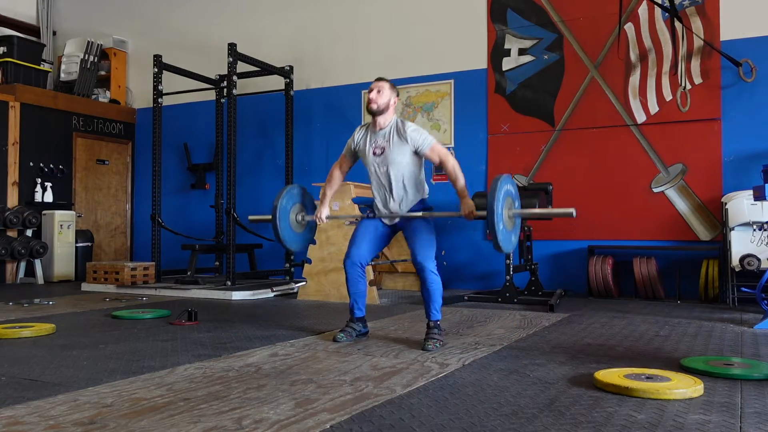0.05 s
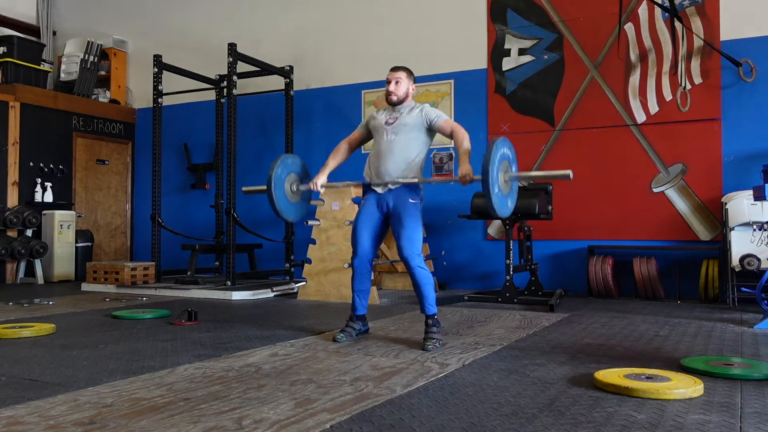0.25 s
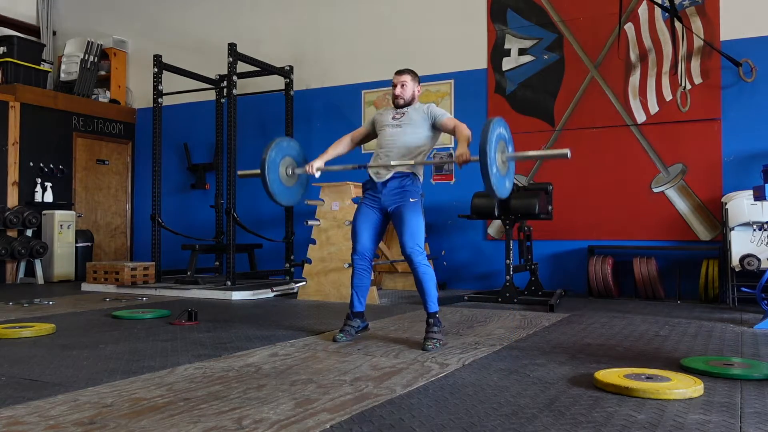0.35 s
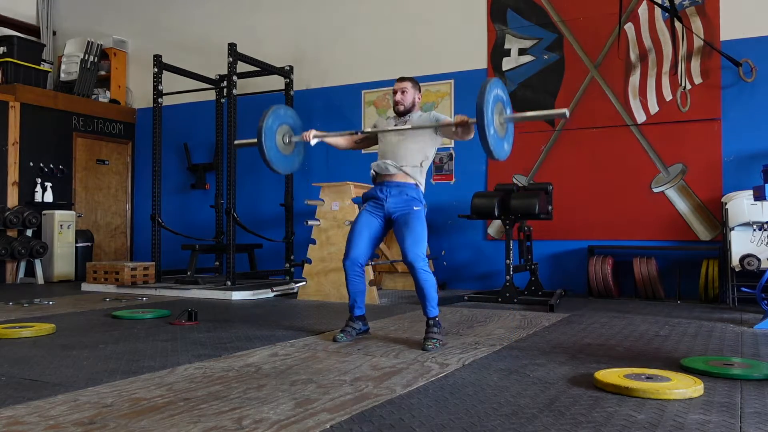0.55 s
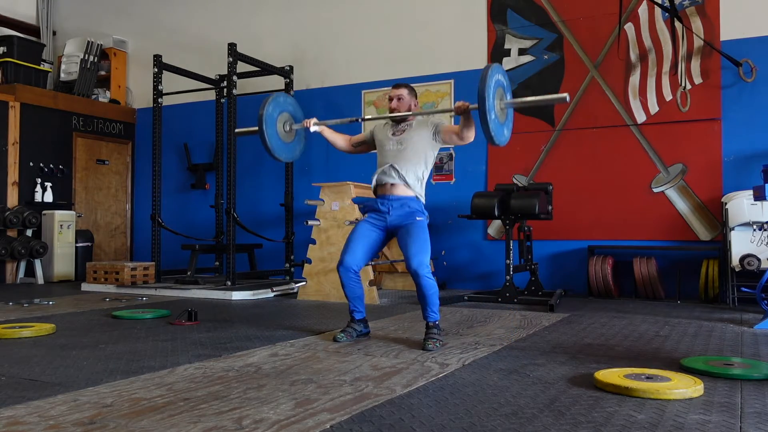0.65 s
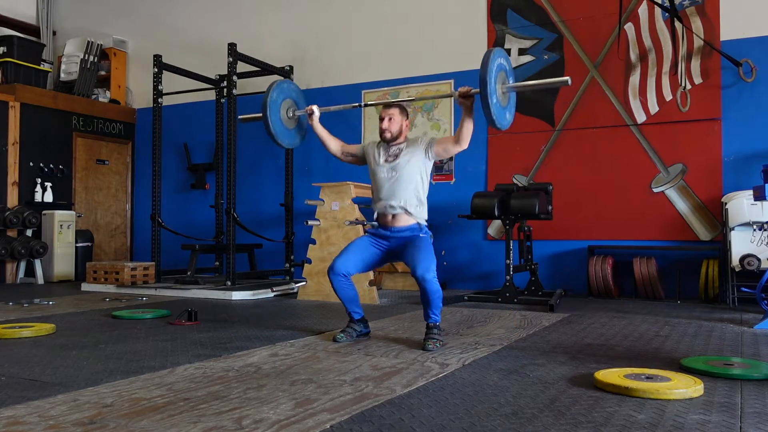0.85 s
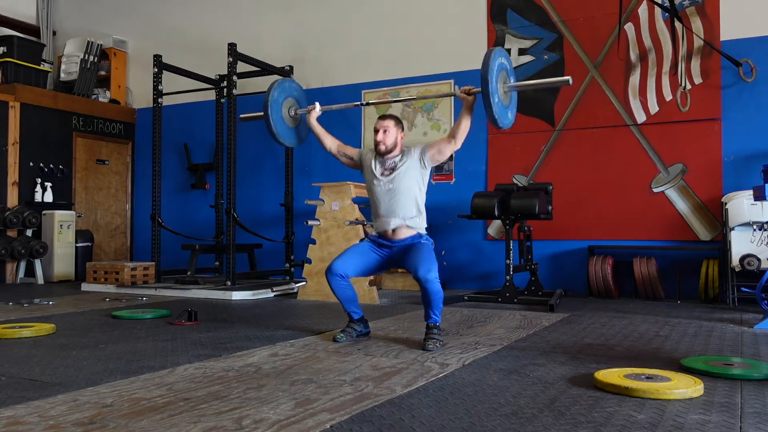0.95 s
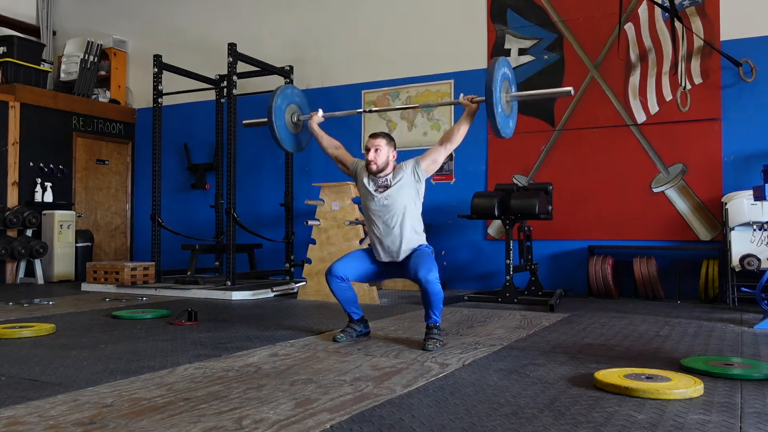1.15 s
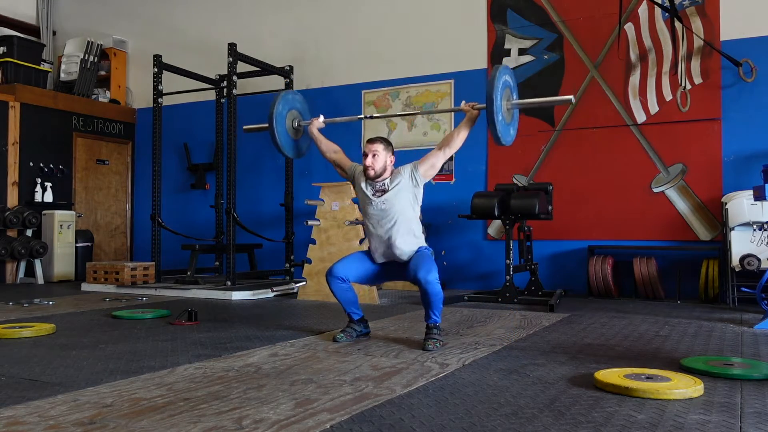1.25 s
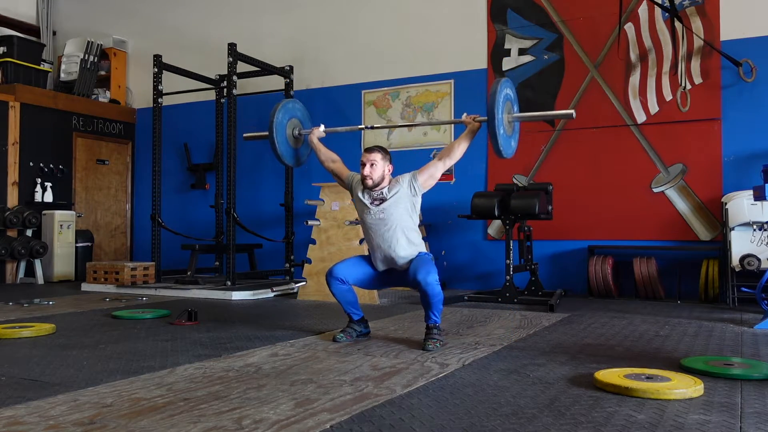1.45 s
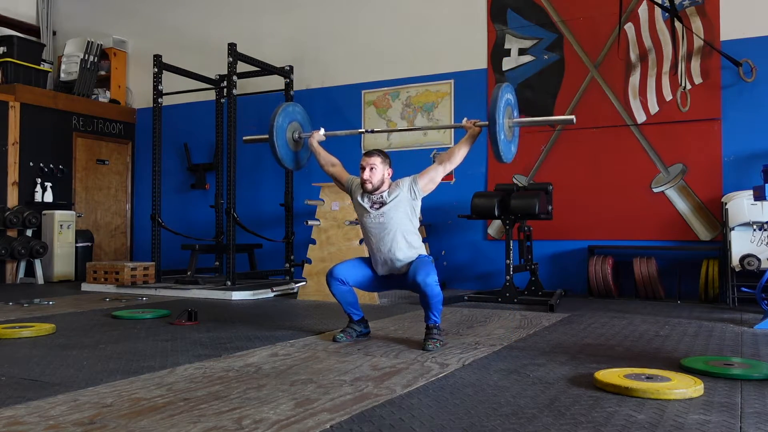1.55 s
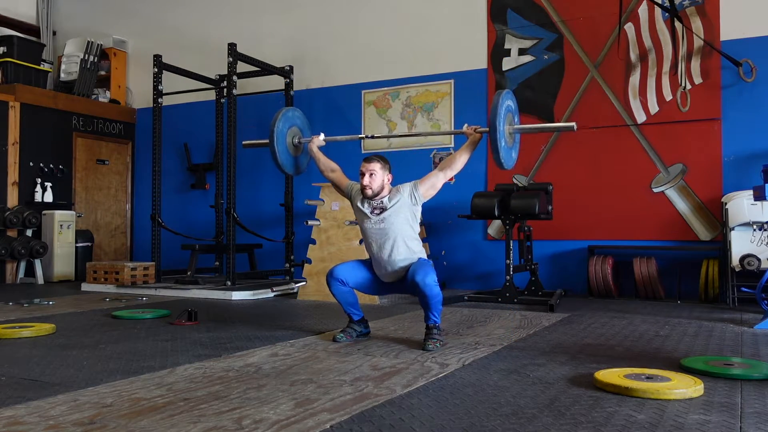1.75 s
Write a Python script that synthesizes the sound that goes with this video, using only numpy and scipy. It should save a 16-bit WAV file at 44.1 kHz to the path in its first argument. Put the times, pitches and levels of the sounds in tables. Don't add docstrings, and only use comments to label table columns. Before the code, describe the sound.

Barbell clatter: loose plates knock and steel sleeves clink, then feet thud onto a platform in an echoing gym

```python
import sys
import numpy as np
from scipy import signal
from scipy.fft import rfft, irfft, next_fast_len
from scipy.io import wavfile
from scipy.ndimage import map_coordinates

SR = 44100
rng = np.random.default_rng(int(sys.argv[2]) if len(sys.argv) > 2 else 0)


def transcribe(signal):
    frames = np.atleast_2d(signal).T
    limited = np.clip(frames, -1, 1)
    pcm = np.round(limited * 32767).astype(np.int16)
    wavfile.write(sys.argv[1], SR, pcm)


def linear_from_db(decibels):
    return 10 ** (np.asarray(decibels, float) / 20)


N = 79380
T = np.arange(N) / SR


def unit(x):
    return x / np.sqrt(np.mean(x ** 2) + 1e-20)


def along(points, hz):
    f, v = np.transpose(points)
    return np.interp(np.log(hz + 1), np.log(f + 1), v)


def filtered(x, response):
    m = next_fast_len(N + SR // 2)
    return irfft(rfft(x, m) * response(np.fft.rfftfreq(m, 1 / SR)), m)[..., :N]


def body(peaks):
    def response(f):
        total = 0
        for k, (centre, width, db) in enumerate(peaks):
            peak = 1j * f * width / (centre * centre - f * f + 1j * f * width)
            total = total + (-1) ** k * linear_from_db(db) * peak
        return total
    return response


def ring(modes, t, rise_s, spread_db):
    total = 0
    for hz, db, t60 in modes:
        fade = linear_from_db(db + spread_db * rng.normal() - 60 * t / t60)
        detuned_hz = hz * (1 + 0.014 * rng.normal())
        total = total + fade * np.sin(2 * np.pi * detuned_hz * t)
    return (1 - np.exp(-t / rise_s)) * total


def add(track, s, sound):
    track[round(s * SR):][:len(sound)] += sound


def hiss(spectrum, wide_db):
    mid, side = filtered(rng.standard_normal((2, N)), lambda hz: linear_from_db(along(spectrum, hz)))
    side = linear_from_db(wide_db) * side
    return unit(np.array([mid + side, mid - side]))


# t/s, peak level/dB, low f/Hz, high f/Hz, high over low level/dB
PLATE_KNOCKS = [(.232, -22.5, 672, 1740, -2.5), (.235, -9.5, 654, 1687, 8), (.246, -20.5, 673, 1570, 9.5),
                (.287, -7, 689, 1246, 20.5), (.328, -16.5, 691, 1136, 19.5), (.334, -16, 685, 1218, 18),
                (.344, -18, 640, 1121, 30), (.350, -25.5, 640, 1100, 11), (.3615, -19.5, 640, 1287, 12),
                (.372, -13.5, 627, 1406, 3), (.384, -21, 603, 1307, 5), (.393, -26.5, 640, 1300, 18),
                (.402, -30, 700, 1270, 19), (.407, -22, 680, 1200, 30), (.414, -17, 684, 1230, 18.5),
                (.422, -19.5, 708, 1230, 28), (.477, -20.5, 860, 1256, 15.5), (.500, -18.5, 698, 1300, 4),
                (.508, -28.5, 694, 1270, 7.5), (.514, -23.5, 690, 1280, 23), (.537, -26, 720, 1490, 27),
                (.563, -27, 674, 1220, 11), (.523, -21, 706, 1339, 13.5), (.545, -23.5, 720, 1280, 36),
                (.579, -20, 906, 1611, 6), (.586, -19, 617, 1624, -9), (.600, -20, 676, 1278, 14),
                (.626, -22.5, 927, 1556, -8), (.636, -16, 760, 1551, 0), (.639, -14, 797, 1140, 15),
                (.640, -17.5, 744, 1576, 10.5), (.645, -8, 739, 1550, -2.5), (.657, -32, 760, 1800, 2)]
# t/s, peak level/dB, low # f/Hz, high f/Hz, high over low level/dB
HARD_RAPS = [(.164, -38.5, 2165, 3740, -3), (.166, -42.5, 650, 1240, 6), (.200, -32.5, 1160, 1450, 3.5),
             (.2125, -29, 700, 2100, 3), (.276, -40, 866, 1540, 16), (.4685, -10.5, 770, 1708, 5),
             (.469, -16.5, 518, 2896, -11.5), (.488, -16.5, 820, 1300, 4), (.488, -26, 4110, 4560, -4),
             (.502, -31.5, 2790, 4490, -10), (.657, -27.5, 4200, 4450, 2), (1.504, -28, 920, 1690, -13),
             (1.504, -34, 736, 1300, -11), (1.510, -36, 958, 1706, -5), (1.548, -48.5, 950, 1650, -18),
             (1.646, -35.5, 1103, 1575, -4), (1.651, -42, 1140, 1600, 10)]
KNOCK_RISE_S, KNOCK_FALL_S, KNOCK_SNAP_DB = .002, .007, -16.5
RAP_RISE_S, RAP_FALL_S, RAP_SNAP_DB = .0004, .005, -16.5
FALL_POWER = 1.7
ROUGHNESS = .2


def plates():
    out, t = np.zeros(N + SR), np.arange(SR // 16) / SR
    for rows, rise_s, fall_s, snap_db in (
            (PLATE_KNOCKS, KNOCK_RISE_S, KNOCK_FALL_S, KNOCK_SNAP_DB),
            (HARD_RAPS, RAP_RISE_S, RAP_FALL_S, RAP_SNAP_DB)):
        shape = (1 - np.exp(-t / rise_s)) ** 2 * np.exp(-(t / fall_s) ** FALL_POWER)
        shape = shape / shape.max()
        for s, db, low_hz, high_hz, over_db in rows:
            wobbles = rng.standard_normal((2, 40))
            rough = [1 + ROUGHNESS * map_coordinates(knots, [t * 400]) for knots in wobbles]
            low = rough[0] * np.sin(2 * np.pi * low_hz * t)
            high = rough[1] * np.sin(2 * np.pi * high_hz * t)
            pair = (low + linear_from_db(over_db) * high) / (1 + linear_from_db(over_db))
            dull = signal.butter(2, [.75 * low_hz, 1.25 * high_hz], "band", fs=SR)
            noise = signal.lfilter(*dull, rng.standard_normal(len(t)))
            snap = linear_from_db(snap_db) * unit(signal.lfilter(*dull, noise))
            add(out, s - .001, linear_from_db(db) * shape * (pair + snap))
    return out[:N]


# t/s, peak level/dB, bright over dark modes level/dB
SLEEVE_CLINKS = [(0.166, -30.5, -22), (0.2149, -27.5, -18), (0.2309, -24, -22.5), (0.2434, -15.5, -17.5),
                 (0.2574, -40, -11), (0.2857, -23, -49), (0.3057, -41, -18.5), (0.3409, -20, -15.5),
                 (0.391, -20, -8.5), (0.3947, -25, -13.5), (0.424, -26, -19), (0.4494, -25.5, -9),
                 (0.4693, -20, -15.5), (0.4885, -12.5, -18), (0.5013, -18.5, -14), (0.5372, -19, -18),
                 (0.6029, -30.5, -2), (0.607, -19.5, -22.5), (0.6421, -19, -9.5), (0.6594, -24.5, -24.5),
                 (0.6881, -37.5, -2)]
# f/Hz, level/dB, time to fall 60 dB/s
DARK_STEEL = [(2793, 6.5, 0.012), (3450, -21, 0.029), (3754, -4, 0.028), (4270, -0.5, 0.008),
              (4610, -7, 0.014)]
BRIGHT_STEEL = [(5600, -8, .02), (6200, -1, .035), (6330, -8, .08), (6450, -4, .03), (7100, -10, .02),
                (9900, -28, .012)]
CLINK_DB, SCRAPE_DB, SCRAPE_S = -10.5, 7.5, 0.0055
CLINK_SPREAD_DB = 2.5


def sleeves():
    out, rub, t = np.zeros(N + SR), np.zeros((2, N + SR)), np.arange(SR // 16) / SR
    for s, db, bright_db in SLEEVE_CLINKS:
        dark_ring = ring(DARK_STEEL, t, 0.00097, CLINK_SPREAD_DB)
        bright_ring = ring(BRIGHT_STEEL, t, 0.00079, CLINK_SPREAD_DB)
        add(out, s, linear_from_db(db + CLINK_DB) * (dark_ring + linear_from_db(bright_db + 7.0) * bright_ring))
        fade = np.exp(-(t / SCRAPE_S) ** 2)
        scrape = linear_from_db(db + CLINK_DB + SCRAPE_DB) * fade * rng.standard_normal((2, len(t)))
        add(rub[0], s, scrape[0])
        add(rub[1], s, linear_from_db(bright_db + 4.5) * scrape[1])
    dark = body([(2100, 410, -0.41), (2785, 820, 1.3), (4200, 1400, 0.2)])
    bright = body([(5960, 630, 6.0), (7670, 760, -17.5)])
    dark_scrape = filtered(rub[0, :N], lambda f: dark(f) * dark(f))
    return out[:N] + dark_scrape + filtered(rub[1, :N], bright)


# t/s, level/dB
SHAKE_STRENGTH = [
    (.2, -69.5),
    (.26, -35.5),
    (.325, -30.5),
    (.43, -28),
    (.5, -31),
    (.6, -27),
    (.7, -32.5),
    (.9, -41.5),
    (1.4, -62.5),
    (1.8, -65),
]
# f/Hz, width/Hz, level/dB
RUBBER_BODY = [(640, 207, -5), (812, 177, -4), (1230, 348, 0.5), (1553, 46, 4), (1640, 300, -3),
               (2690, 200, -11)]
STEEL_BODY = [(2926, 290, 10.5), (3750, 150, 9), (4160, 910, 6), (6440, 250, 3), (6850, 240, -3),
              (9900, 500, -27)]
# f/Hz, width/Hz, level/dB
HUB_BODY = [(1205, 102, 7), (1300, 86, 4)]
# t/s, level/dB
HUB_STRENGTH = [
    (.28, -84),
    (.3, -41),
    (.325, -40.5),
    (.335, -25.5),
    (.43, -34),
    (.455, -39),
    (.55, -35),
    (.63, -44.5),
    (.7, -53.5),
]
TAPS_PER_S, TAP_SPREAD_DB = 1500, 2.5
JINGLE_DB, SOFT_HZ = -15.5, 2340


def rattle():
    hits = rng.random((2, N)) < TAPS_PER_S / SR
    force = linear_from_db(TAP_SPREAD_DB * rng.exponential(size=(2, N)).clip(0, 3))
    taps = hits * force * rng.normal(size=(2, N))
    strength = linear_from_db(np.interp(T, *np.transpose(SHAKE_STRENGTH)))
    rubber = filtered(taps[0], lambda f: body(RUBBER_BODY)(f) / (1 + 1j * f / SOFT_HZ) ** 2)
    steel = filtered(taps[1], lambda f: body(STEEL_BODY)(f) / (1 + 1j * f / (3 * SOFT_HZ)) ** 2
                     * f / (f + SOFT_HZ))
    hub_strength = linear_from_db(np.interp(T, *np.transpose(HUB_STRENGTH), right=-99))
    hub = hub_strength * unit(filtered(rng.standard_normal(N), body(HUB_BODY)))
    return hub + strength * (unit(rubber) + linear_from_db(JINGLE_DB) * unit(steel))


# t/s, slap level/dB, thud level/dB
LANDINGS_AND_BUMPS = [
    (0.368, -23, -17.5),
    (0.463, -19.5, -21.5),
    (0.7465, -4.5, -6.5),
    (0.9426, -11.5, -18),
    (1.041, -35, -28),
]
# f/Hz, level/dB, time to fall 60 dB/s
PLATFORM_MODES = [(123.2, -12.5, 0.19), (157, -7, 0.06), (224, -2, 0.025), (267.6, 3, 0.02),
                  (364, 3.5, 0.023), (450, -6, 0.0081)]
SLAP_HZ, SLAP_S, THUD_LAG_S = 760, 0.001, 0.00285
FAR_WALL_S, FAR_WALL_DB, FAR_WALL_HZ = .034, -4, 470


def shoes():
    out, t = np.zeros(N + SR), np.arange(SR // 2) / SR
    u = t[:440] - 220 / SR
    slap = np.exp(-(u / SLAP_S) ** 2) * np.cos(2 * np.pi * SLAP_HZ * u)
    for s, slap_db, thud_db in LANDINGS_AND_BUMPS:
        add(out, s - 220 / SR, linear_from_db(slap_db) * slap)
        add(out, s + THUD_LAG_S, linear_from_db(thud_db - 9.5) * ring(PLATFORM_MODES, t, 0.00035, 0.3))

    def with_far_wall(f):
        delay = -2j * np.pi * f * FAR_WALL_S
        return 1 + linear_from_db(FAR_WALL_DB) * np.exp(delay - (f / FAR_WALL_HZ) ** 2 / 2)
    return filtered(out[:N], with_far_wall)


# f/Hz, width/Hz, level/dB
LOOSE_BOARDS = [(139, 53, 2), (250, 110, 3), (393, 165, -0.5)]
SHUDDER_DB, SHUDDER_T60, SHUDDER_RISE_S = -16, 0.65, 0.033


def shudder():
    swell = 0
    for s, _, thud_db in LANDINGS_AND_BUMPS:
        t = np.maximum(T - s, 0)
        rise = 1 - np.exp(-(t / SHUDDER_RISE_S) ** 2)
        swell = swell + linear_from_db(thud_db + SHUDDER_DB - 60 * t / SHUDDER_T60) * rise
    bursts = linear_from_db(3 * map_coordinates(rng.standard_normal(120), [T * 60]))
    boards = filtered(rng.standard_normal(N), lambda f: body(LOOSE_BOARDS)(f) / (1 + 1j * f / 600) ** 2)
    return swell * unit(bursts * boards)


# t/s, level/dB
LOAD_STRENGTH = [
    (.02, -65),
    (.2, -55),
    (.26, -35.5),
    (.4, -34),
    (.7, -38.5),
    (.95, -32.5),
    (1.2, -53),
    (1.5, -42.5),
    (1.8, -48),
]
# f/Hz, width/Hz, level/dB
LOADED_BOARDS = [(123.8, 16, 9), (191, 44, 4), (304, 1100, -15)]


def platform():
    boards = filtered(rng.standard_normal(N), lambda f: body(LOADED_BOARDS)(f) / (1 + 1j * f / 400) ** 2)
    return linear_from_db(np.interp(T, *np.transpose(LOAD_STRENGTH))) * unit(boards)


# f/Hz, level/dB
CLOTH_COLOUR = [(530, -72), (900, -24.5), (1480, 5), (1730, -4), (2070, 5.5), (2630, -0.5), (2850, 10.5),
                (6630, -4.5), (10800, -15.5), (14000, -58.5), (22000, -120)]
BRUSH_S, BRUSH_RISE_S, BRUSH_FALL_S, BRUSH_DB = .133, .028, .032, -44


def brush():
    width = np.where(T < BRUSH_S, BRUSH_RISE_S, BRUSH_FALL_S)
    swell = np.exp(-((T - BRUSH_S) / width) ** 2)
    return linear_from_db(BRUSH_DB) * swell * hiss([(500, -58.5)] + list(CLOTH_COLOUR), -46)[0]


# f/Hz, time to fall 60 dB/s
HALL_T60 = [(100, 2.84), (300, 1.13), (600, 1.22), (1000, 1.55), (3000, 1.7), (6000, 0.71), (10000, 1.57)]
# f/Hz, level/dB
HALL_WIDTH = [(60, -16.5), (250, 3), (700, 3), (2000, 2), (5000, -1.5), (10000, -7)]
# t/s, level/dB
WALL_ECHOES = [
    (.005, -29.5),
    (.013, -26),
    (0.043, -16),
    (0.046, -15.5),
    (0.082, -20),
]
HALL_DB, HALL_BUILD_S, HALL_LOW_DB, HALL_WIDE_DB = -6.5, 0.031, 5, -13


def hall(x):
    hz, t, z = signal.stft(rng.standard_normal((2, 2 * SR)), SR, nperseg=256)
    low_boost = HALL_LOW_DB * (hz < 400)[:, None]
    fade = linear_from_db(-60 * t / along(HALL_T60, hz)[:, None] + low_boost)
    shape = fade * (1 - np.exp(-(t / HALL_BUILD_S) ** 2))
    share = np.array([1 + 0 * hz, linear_from_db(HALL_WIDE_DB + along(HALL_WIDTH, hz))])[:, :, None]
    mid, side = signal.istft(z * shape * share, SR, nperseg=256)[1]
    tail = linear_from_db(HALL_DB) * np.array([mid + side, mid - side]) / np.linalg.norm(mid)
    for s, db in WALL_ECHOES:
        tail[:, round(s * SR)] += linear_from_db(db)
    return signal.fftconvolve(x[None], tail, axes=1)[:, :N]


# f/Hz, level/dB
AIR_COLOUR = [(20, -13.5), (45, 4), (80, 0.5), (130, -12.5), (230, -31.5), (800, -30), (3500, -52),
              (10900, -50.5)]
# f/Hz, level/dB
FADING_COLOUR = [(1800, -26), (2600, -7.5), (3700, -6.5), (5200, -13), (7000, -19)]
AIR_DB, AIR_WIDE_DB = -40, -26
FADING_DB, FADING_T60 = -65.5, 7.9


def air():
    fading = linear_from_db(FADING_DB - 60 * T / FADING_T60) * hiss(FADING_COLOUR, AIR_WIDE_DB)
    return linear_from_db(AIR_DB) * hiss(AIR_COLOUR, AIR_WIDE_DB) + fading


PAN_DB = -.2


def scene():
    near = plates() + sleeves() + rattle() + shoes() + brush()
    lift = near + platform() + hall(near) + shudder()
    return lift * linear_from_db(np.array([[PAN_DB], [-PAN_DB]])) + air()


def low_pass(x):
    return signal.sosfilt(signal.butter(12, 11150, fs=SR, output="sos"), x)


BASS_CUT_HZ, ROLL_HZ, TOP_HZ = 62, 10300, 11150
SELF_NOISE_DB, HISS_WIDE = -82.5, .16


def record(dry):
    def colour(hz):
        thin_bass = (1j * hz / (BASS_CUT_HZ + 1j * hz)) ** 2
        return thin_bass / (1 + (hz / ROLL_HZ) ** 8)
    self_noise = rng.standard_normal(N) + HISS_WIDE * rng.standard_normal((2, N))
    heard = filtered(dry, colour) + linear_from_db(SELF_NOISE_DB) * self_noise
    mix = filtered(heard, lambda hz: hz < TOP_HZ)
    return low_pass(mix)


dry = scene()
out = record(dry)
transcribe(out)
```